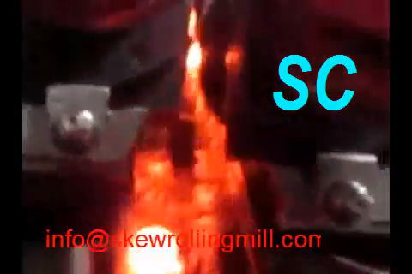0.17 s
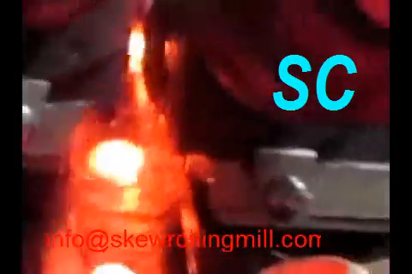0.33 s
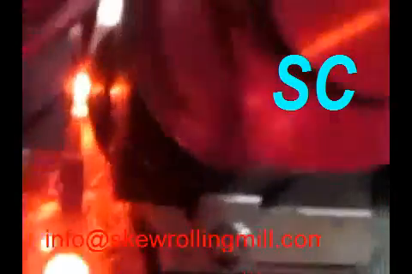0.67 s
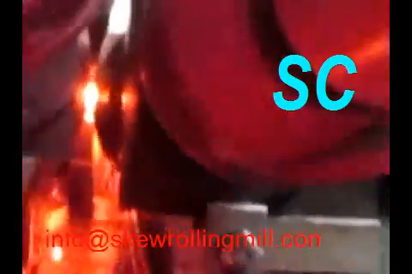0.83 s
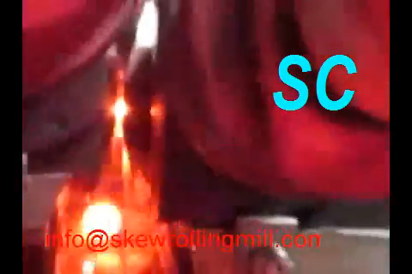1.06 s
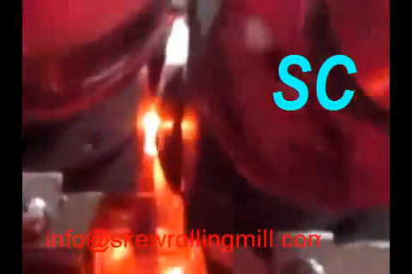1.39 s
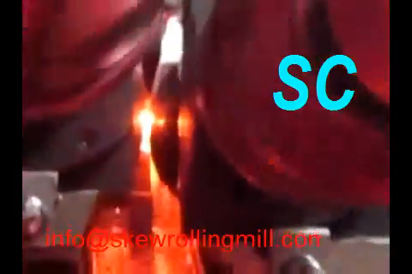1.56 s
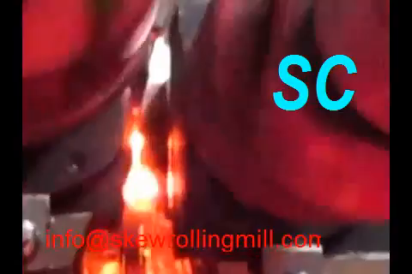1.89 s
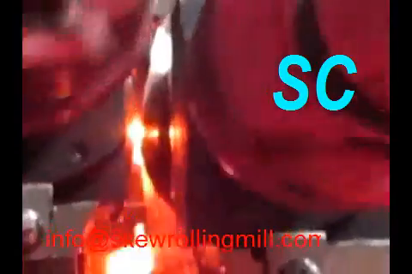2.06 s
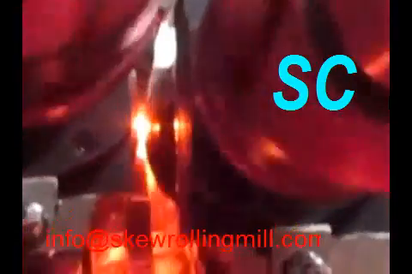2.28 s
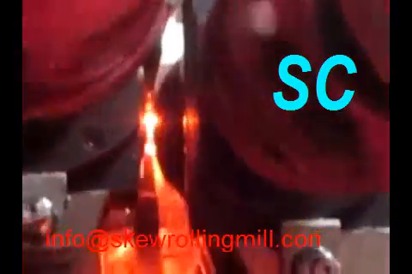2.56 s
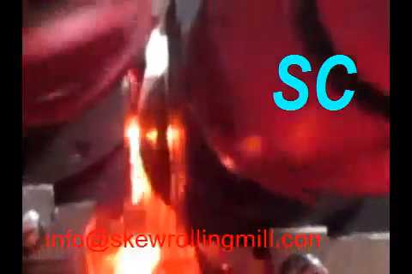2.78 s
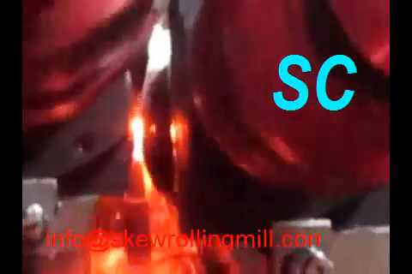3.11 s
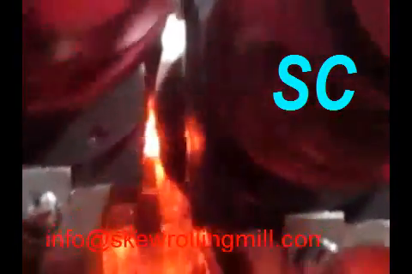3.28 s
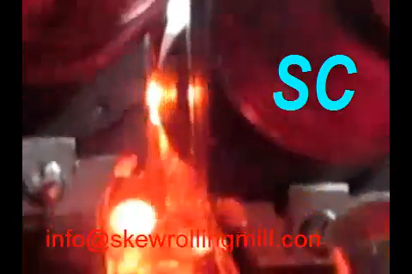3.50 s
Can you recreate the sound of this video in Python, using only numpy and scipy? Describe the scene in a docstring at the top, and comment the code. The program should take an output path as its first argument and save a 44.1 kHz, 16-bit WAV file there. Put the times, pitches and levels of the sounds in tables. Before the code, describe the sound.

A rolling mill roars and hums steadily while steel balls clank and thud into a chute.

```python
"""A rolling stand roars, hums and whines while steel balls clank and thud into a chute amid loose clatter.
A skew rolling mill squeezes hot steel bar into balls, in a big hall, close to a small microphone.
Roar: flickering noise bands and frame resonances; hum and whine: wavering sines.
Clanks: damped steel modes plus cracks; crashes: gritty noise bursts; clatter: random small clanks.
A diffuse tail follows the blows; the microphone rounds peaks and loses the top."""
import sys
import numpy as np
from scipy import signal
from scipy.fft import rfft, irfft
from scipy.io import wavfile
from scipy.ndimage import uniform_filter1d

SR = 44100
rng = np.random.default_rng(int(sys.argv[2]) if len(sys.argv) > 2 else 0)


def natural_amplitude(level_db):
    """Convert a level in decibels to a linear amplitude factor, elementwise."""
    exponent = np.asarray(level_db, float) / 20
    return 10 ** exponent


def output_pcm(signal):
    """Save a mono or channel-first signal as 16-bit PCM at the path in sys.argv[1].

    Samples are clipped to [-1, 1] before scaling.
    """
    pcm = np.clip(np.atleast_2d(signal).T, -1, 1) * 32767
    wavfile.write(sys.argv[1], SR, np.round(pcm).astype(np.int16))


N = 160524
T = np.arange(N) / SR

# Load of the stand: (time [s], roar level [dB], treble tilt [dB per octave], bass boost [dB])
LOAD = [(0, -21.5, 4.5, -3), (.35, -20, 3, 1), (.72, -21, 1.6, -1.5), (1.5, -20.5, 2.5, 1.5),
        (2.02, -23, 3, 3), (2.3, -19.5, 1.3, 0), (3.03, -22.5, 2.5, 2), (3.3, -18, 0.8, 4),
        (3.47, -18.5, -1, 6.5), (3.5, -24.5, 4, -2), (3.64, -26.5, -2, -3)]


def unit(x):
    """Scale to rms 1."""
    return x / np.sqrt(np.mean(x ** 2))


def curve(table, col):
    """Column of a table, interpolated over time."""
    rows = np.array(table)
    return np.interp(T, rows[:, 0], rows[:, col])


def resonate(x, hz, width_hz):
    """Two passes through one resonance."""
    b, a = signal.iirpeak(hz, hz / width_hz, fs=SR)
    return signal.lfilter(b, a, signal.lfilter(b, a, x))


def band(hz, width_hz):
    """Resonant noise, rms 1; the first second, where the filter settles, is cut."""
    return unit(resonate(rng.standard_normal(N + SR), hz, width_hz)[SR:])


def walk(rate_hz):
    """Random levels held 1 / rate_hz seconds and smoothed twice."""
    hold = int(SR / rate_hz)
    steps = np.repeat(rng.standard_normal(N // hold + 1), hold)
    return 1.793 * uniform_filter1d(uniform_filter1d(steps, hold), hold)[:N]


def tilted(length, tilt_db):
    """Noise of rms 1 whose spectrum slopes by tilt_db per octave and is thin under 700 Hz."""
    f = np.fft.rfftfreq(length, 1 / SR) + 1
    gain = natural_amplitude(tilt_db * np.log2(f / 2000)) / (1 + (700 / f) ** 3)
    return unit(irfft(rfft(rng.standard_normal(length)) * gain, length))


def wavering_tone(hz, wander_hz):
    """Sine of rms 1 whose pitch wanders."""
    return np.sqrt(2) * np.sin(2 * np.pi * np.cumsum(hz + wander_hz * walk(25)) / SR)


def add(out, start_s, x):
    """Mix x in at start_s."""
    i = int(start_s * SR)
    out[i:i + len(x)] += x[:max(N - i, 0)]


def hall(x):
    """Dry blows plus a diffuse, exponentially decaying noise tail that slopes down in the treble."""
    t60_s, tail_db, onset_s = .4, -13.5, 0.0087
    t = T[:SR]
    tail = tilted(SR, -2.0) * 1000. ** (-t / t60_s) * np.minimum(t / onset_s, 1)
    tail = natural_amplitude(tail_db) * tail / np.sqrt(np.sum(tail ** 2))
    tail[0] += 1  # direct sound
    return signal.fftconvolve(x, tail)[:N]


def stand_roar():
    """Third-octave noise bands flicker independently; load moves their level, tilt and bass."""
    # Roar spectrum: (frequency [Hz], relative density [dB per Hz])
    roar_spectrum = [(15, -51), (25, -20.5), (49, -22.5), (138, -17), (244, -4.5), (411, -0.5), (497, 0),
                     (615, -1), (1060, -5.5), (1670, -8.5), (3400, -16), (5590, -25.5), (7260, -35),
                     (9440, -73), (16000, -120)]
    flicker_db, flicker_hz = 1.65, 8.98
    points = np.array(roar_spectrum)
    tilt_db, bass_db = curve(LOAD, 2), curve(LOAD, 3)
    out = np.zeros(N)
    for hz in 28 * 2 ** (np.arange(25) / 3):
        density_db = np.interp(np.log(hz), np.log(points[:, 0]), points[:, 1])
        db = density_db + 10 * np.log10(hz / 1000)  # bandwidth grows with hz
        db = db + tilt_db * np.log2(max(hz / 1000, 1)) + bass_db * (hz < 170)
        out += natural_amplitude(db + flicker_db * walk(flicker_hz)) * band(hz, hz / 3)
    return 0.4 * out * natural_amplitude(curve(LOAD, 1))


def frame_resonances():
    """Rolling excites narrow frame resonances that flicker and follow the load."""
    # Frame resonances: (frequency [Hz], width [Hz], level before load [dB])
    frame_modes = [(103.3, 9.7, -34.5), (376.4, 33, -20), (441.7, 22, -17.5), (687.7, 34, -18),
                   (853.5, 40, -16.5), (938, 92, -16.5), (1068, 52, -13.5), (1205, 50, -16.5)]
    flicker_db, flicker_hz = 2.1, 5.73
    bass_db = curve(LOAD, 3)
    out = np.zeros(N)
    for hz, width_hz, db in frame_modes:
        out += natural_amplitude(db + bass_db * (hz < 170) + flicker_db * walk(flicker_hz)) * band(hz, width_hz)
    return out * natural_amplitude(curve(LOAD, 1))


def housing_hum():
    """Two close housing modes and their lower octave surge abruptly, as if struck, then die away."""
    # Housing modes: (frequency [Hz], relative level [dB])
    housing_modes = [(488, -5), (509, 0)]
    # Hum of the mode pair: (time [s], level [dB])
    pair_level = [(0.0, -31), (0.3, -27), (0.33, -20), (0.85, -36.5), (0.89, -24.5), (1.05, -36.5),
                  (1.15, -28), (1.225, -38), (1.245, -16.5), (1.31, -20.5), (1.335, -33.5), (1.63, -33),
                  (1.7, -24), (1.93, -25), (2.0, -42), (2.06, -21.5), (2.1, -39.5), (2.21, -19.5),
                  (2.41, -29), (2.65, -30), (2.7, -20.5), (2.94, -34), (2.97, -27.5), (3.08, -39.5),
                  (3.25, -25.5), (3.6, -37.5), (3.64, -44.5)]
    # Lower octave of the hum: (time [s], level [dB])
    sub_level = [(0.0, -50), (0.25, -35.5), (0.32, -47), (0.36, -27), (0.59, -44.5), (1.53, -40),
                 (1.58, -31), (1.9, -42.5), (3.48, -38.5), (3.59, -54), (3.64, -41.5)]
    flutter_db, pair_wander_hz = 1.64, 3.975
    sub_hz, sub_wander_hz = 247.3, 3.65
    pair = np.zeros(N)
    for hz, db in housing_modes:
        pair += natural_amplitude(db + flutter_db * walk(13)) * wavering_tone(hz, pair_wander_hz)
    sub = natural_amplitude(flutter_db * walk(16)) * wavering_tone(sub_hz, sub_wander_hz)
    return unit(pair) * natural_amplitude(curve(pair_level, 1)) + sub * natural_amplitude(curve(sub_level, 1))


def gear_whine():
    """A thin gear tone wavers in pitch."""
    # Gear whine: (time [s], level [dB])
    whine_level = [(0.0, -42), (3.46, -42.5), (3.64, -51.5)]
    return wavering_tone(3424, 4.1) * natural_amplitude(curve(whine_level, 1))


def clatter():
    """Random patter of small, detuned clinks."""
    rate_per_s, floor_db, spread_db = 70, -35.5, 13.5
    octaves, ring_s, detune = 0.65, 0.0054, .06
    out = np.zeros(N)
    for when, loudness, pitch in rng.random((int(rate_per_s * N / SR), 3)):
        hz = 1000 * 5 ** pitch
        add(out, when * N / SR, clank(floor_db + spread_db * loudness, hz, octaves, ring_s, detune))
    return out


def crash(db, decay_s, tilt_db):
    """A gritty burst of many contacts that also drums the hollow bin, more so for dull bursts."""
    grit_db, attack_s, bin_hz, bin_width_hz = 2.5, 0.001, 1096, 370
    bin_db = 2.5 * -tilt_db - 19
    t = T[:SR // 4]
    grit = np.repeat(rng.standard_normal(len(t) // 200 + 1), 200)[:len(t)]  # 200-sample steps
    shape = np.minimum(t / attack_s, 1) * np.exp(-t / decay_s) * natural_amplitude(grit_db * grit)
    drum = unit(resonate(rng.standard_normal(len(t)), bin_hz, bin_width_hz))
    return natural_amplitude(db) * shape * (tilted(len(t), tilt_db) + natural_amplitude(bin_db) * drum)


def crashes():
    """Crashes of balls on balls, some dull, some bright."""
    # Crashes: (time [s], relative level [dB], decay time constant [s], tilt [dB per octave])
    crash_events = [(0.1129, -4.5, 0.041, -5), (0.2155, -16.5, 0.03, -8.5), (0.293, -8.5, 0.045, -2.5),
                    (0.573, -16.5, 0.044, -4.5), (0.653, -16.5, 0.024, -5), (1.1304, -9, 0.03, -2),
                    (1.554, -12, 0.04, -2), (1.5843, -17.5, 0.04, -5), (2.076, -5.5, 0.043, -2.5),
                    (2.2006, -9.5, 0.045, -1.5), (2.6302, -5.5, 0.02, -0.5), (2.6649, -5.5, 0.062, -5),
                    (2.895, -10, 0.03, 0.5), (3.47, -19, 0.03, 0.5), (3.541, -14.5, 0.032, -0.5)]
    trim_db = -7.5
    out = np.zeros(N)
    for start_s, db, decay_s, tilt_db in crash_events:
        add(out, start_s, crash(db + trim_db, decay_s, tilt_db))
    return out


def clank(db, hz, octaves, ring_s, detune=0.0025):
    """A blow rings steel modes near hz until contact damps them; two rebounds add cracks."""
    # Modes of ball and chute: frequency [Hz]
    mode_hz = [926, 1080, 1250, 1432, 2230, 2760, 3255, 3880, 4059, 4365, 4505, 4877, 4996, 5507]
    # Their relative levels [dB]
    mode_db = [-11, -4, -7, 0, -1, -5, -3, -7, -10, -9, -13, -9, -10, -10]
    # Their free decay times, t60 [s]
    mode_t60_s = [.3, .35, .25, .3, .35, .08, .2, .28, .2, .18, .17, .15, .2, .2]
    scatter_db, rough, damped_s = 1.5, .36, .014
    crack_s, crack_db, rebound_s, rebound_db = 0.0078, -6.5, .025, 0  # rebounds fall within rebound_s
    crack_tilt_db = -5.5 + 1.5 * np.log2(hz / 2000)  # per octave; higher clanks crack brighter
    t = T[:SR // 4]

    f = np.array(mode_hz)
    gain = natural_amplitude(np.array(mode_db) + scatter_db * rng.standard_normal(len(f)))
    gain = gain * np.exp(-.5 * (np.log2(f / hz) / max(octaves, .05)) ** 2)
    gain = gain / np.sqrt(np.sum(gain ** 2))
    f = f[:, None] * (1 + detune * rng.standard_normal((len(f), 1)))
    chatter = 1 + rough * np.repeat(rng.standard_normal((len(f), 50)), 221, axis=1)[:, :len(t)]
    chatter = uniform_filter1d(chatter, size=150, axis=1)
    free_decay = 1000. ** (-t / np.array(mode_t60_s)[:, None])
    ring = gain @ (chatter * np.sin(2 * np.pi * f * t) * free_decay)
    ring = ring * np.exp(-np.maximum(t - ring_s, 0) / damped_s)

    blow = np.exp(-t / crack_s)
    crack = blow.copy()
    for delay in (rng.random(2) * rebound_s * SR).astype(int):
        crack += natural_amplitude(rebound_db) * np.pad(blow, (delay, 0))[:len(t)]
    return natural_amplitude(db) * (ring + natural_amplitude(crack_db) * crack * tilted(len(t), crack_tilt_db))


def clanks():
    """Balls clank into the steel chute."""
    # Clanks: (time [s], relative level [dB], favoured pitch [Hz], favoured span [octaves], free ring [s])
    clank_events = [(.113, -9, 1150, .4, .008), (.123, -9, 1040, .2, .04), (.3591, -10, 4540, .12, .01),
                    (.686, -4, 2380, 1.2, 0.024), (.7422, -15, 3220, 0.25, .012),
                    (.7946, -17.5, 4210, 0.08, .006), (.799, -11.5, 1086, .1, 0.014),
                    (.962, -15.5, 1080, .15, .01), (1.2062, -11, 4500, .3, 0.0073),
                    (1.361, -3.5, 1980, 2.4, 0.019), (1.4516, -14, 4130, .05, .01),
                    (1.5564, -13, 3060, 0.5, 0.0072), (1.8108, -13, 4400, 0.41, 0.0089),
                    (1.9754, -11, 4540, .5, .008), (2.085, -10.5, 2790, 0.35, 0.0062),
                    (2.107, -5.5, 3520, 0.32, .025), (2.108, -6.5, 1290, .25, 0.023),
                    (2.15, -12, 1045, 0.18, .008), (2.188, -13.5, 1067, .15, 0.0069),
                    (2.272, -15, 2270, .3, 0.017), (2.512, -18.5, 1100, .12, .01),
                    (2.6294, -11.5, 4550, .08, 0.0098), (2.666, -5, 1213, 0.15, .025),
                    (2.809, -13.5, 1110, .1, .01), (3.016, -3.5, 2600, 3.5, 0.013),
                    (3.11, -16.5, 1060, .1, .01), (3.481, -15.5, 4540, .12, .008),
                    (3.5214, -12, 4380, 0.34, .012), (3.55, -17, 2630, .19, .008)]
    trim_db = -5.5
    out = np.zeros(N)
    for start_s, db, hz, octaves, ring_s in clank_events:
        add(out, start_s, clank(db + trim_db, hz, octaves, ring_s))
    return out


def scene():
    """All sources, one channel; only the blows sound in the hall."""
    mill = stand_roar() + frame_resonances() + housing_hum() + gear_whine()
    return (mill + hall(clatter() + crashes() + clanks()))[None]


def microphone(x):
    """Saturation rounds peaks, two low-passes remove the top, and a constant offset is added."""
    squash, roll_hz, top_hz, offset = 2.8, 5770, 8220, -.002
    x = np.tanh(squash * x) / squash
    x = signal.sosfilt(signal.butter(4, roll_hz, fs=SR, output="sos"), x)
    x = signal.sosfilt(signal.cheby2(12, 70, top_hz, fs=SR, output="sos"), x)
    return x + offset


def band_limit(x):
    """A steep low-pass at the top of the band."""
    return signal.sosfilt(signal.butter(12, 7410, fs=SR, output="sos"), x)


def record(dry):
    """The finished mix as stored."""
    mix = microphone(dry)
    return band_limit(mix)


dry = scene()
out = record(dry)
output_pcm(out)
```